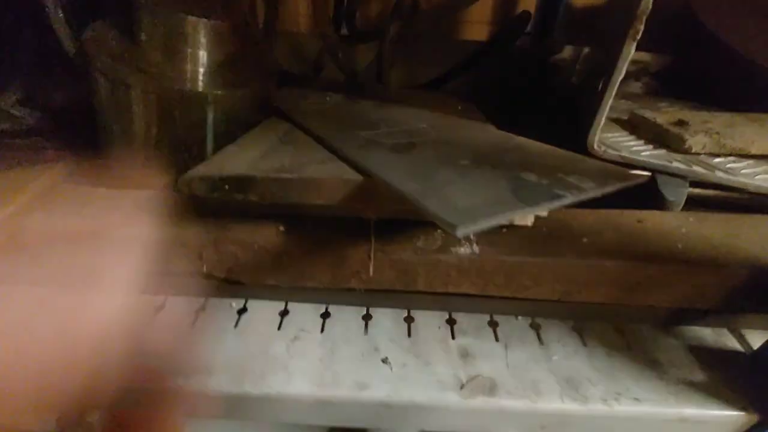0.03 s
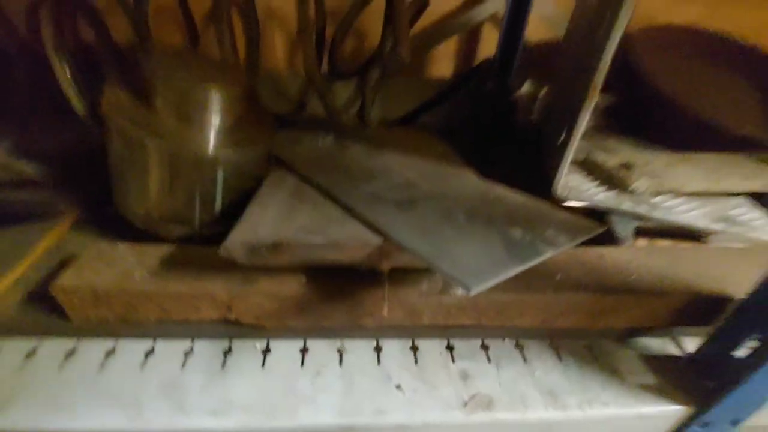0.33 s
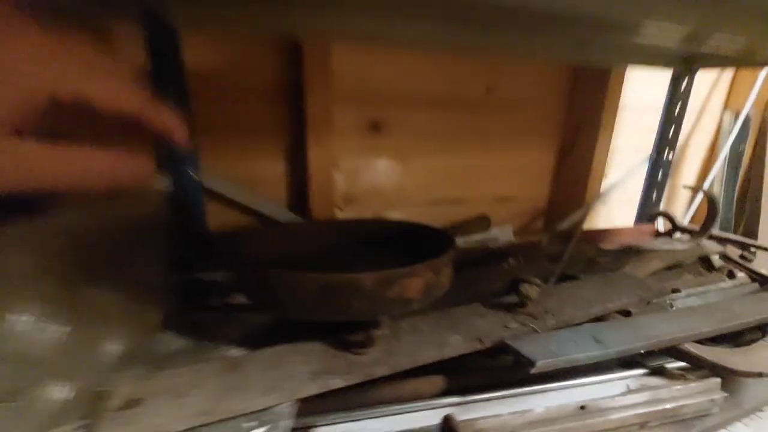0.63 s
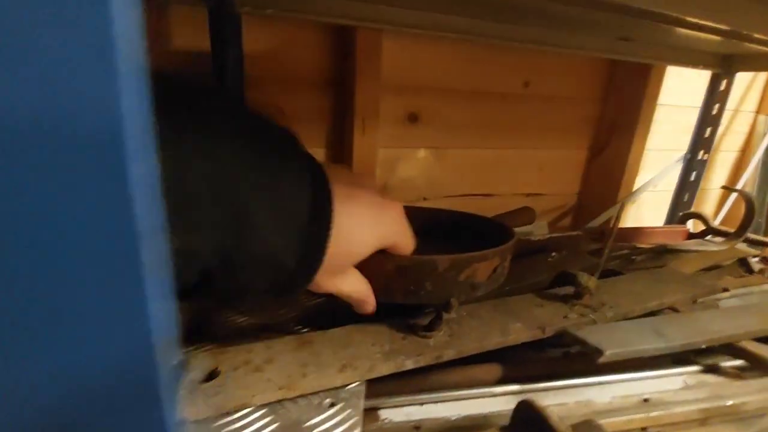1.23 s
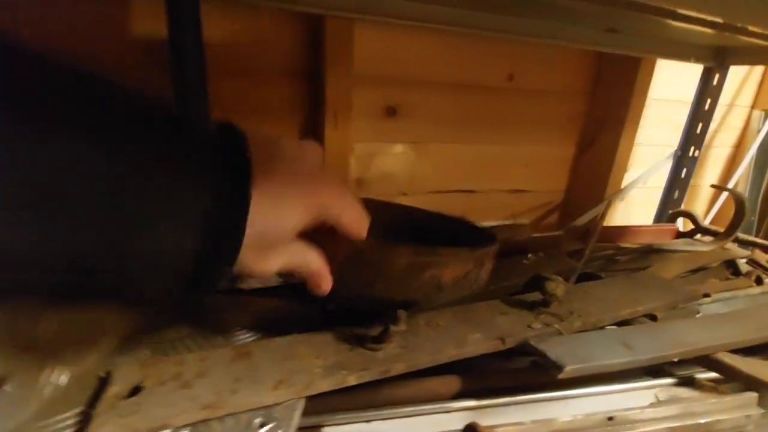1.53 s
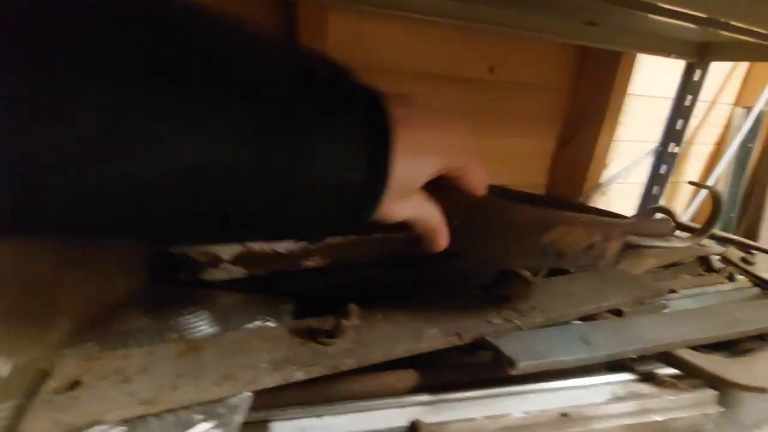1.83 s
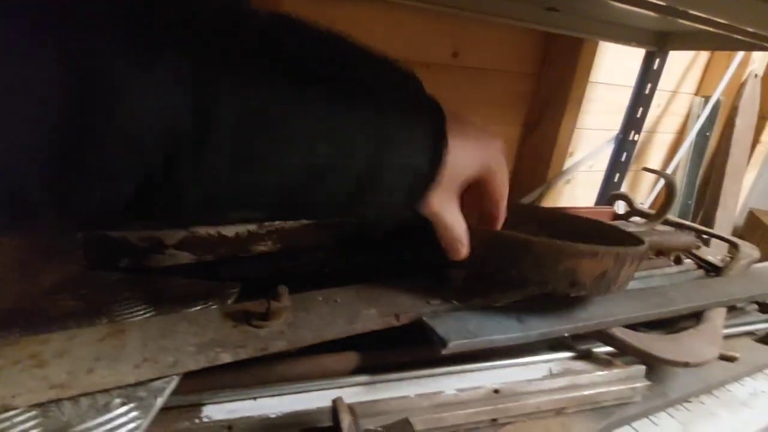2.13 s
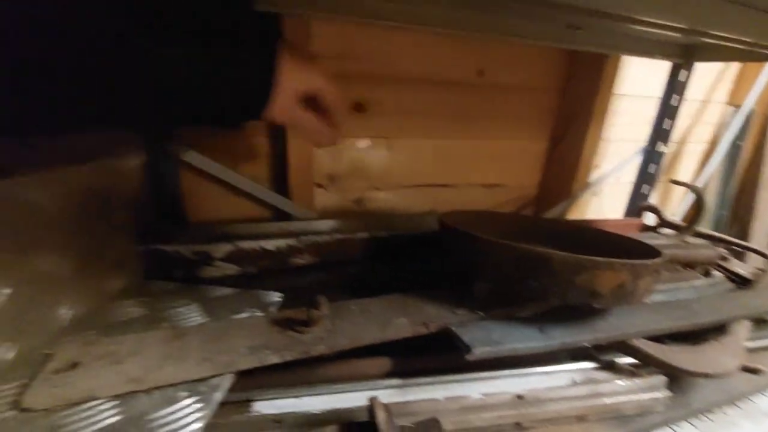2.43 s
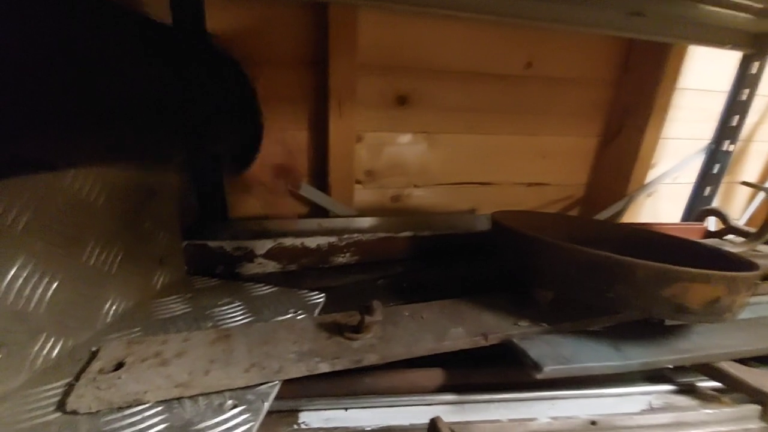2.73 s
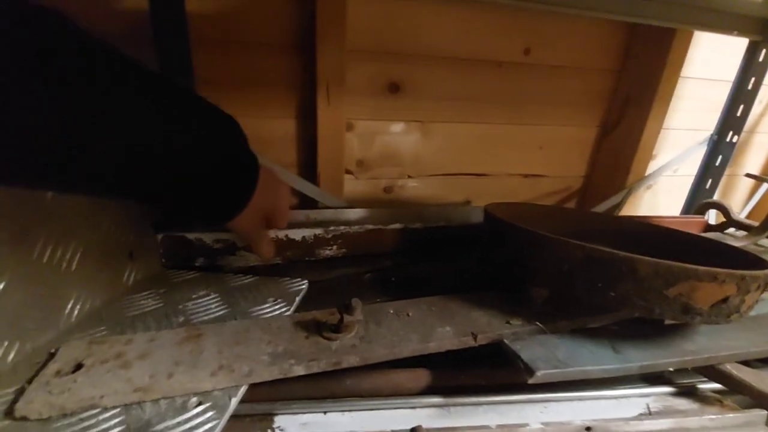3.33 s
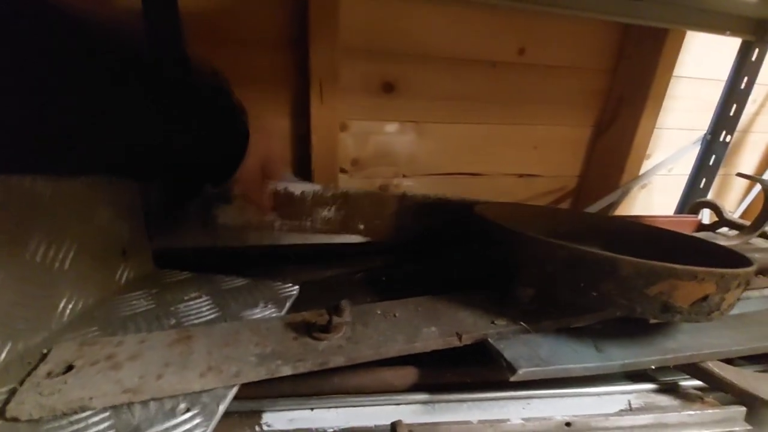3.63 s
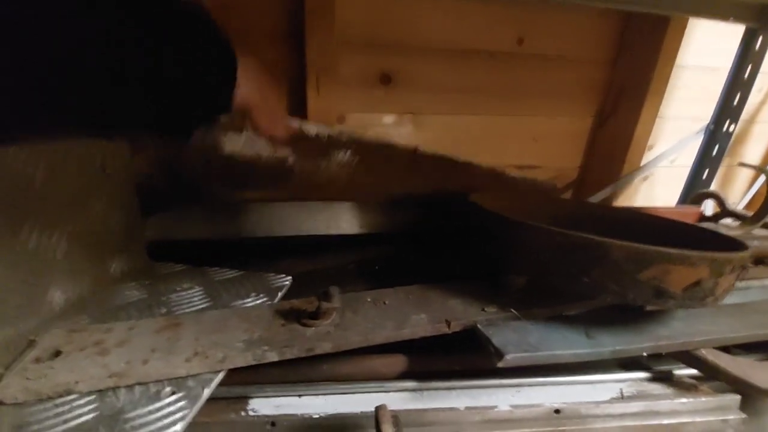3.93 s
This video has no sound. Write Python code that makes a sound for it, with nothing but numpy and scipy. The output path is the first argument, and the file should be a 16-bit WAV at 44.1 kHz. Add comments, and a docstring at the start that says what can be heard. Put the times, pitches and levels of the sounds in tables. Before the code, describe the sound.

An iron pan scrapes across piled scrap and lands with a ringing clatter, before a steel bar is knocked loose and dragged over steel plate. A sleeve rustles faintly near the microphone, over a shed's steady low rumble.

```python
"""A wooden shed with a steady low rumble; a sleeve brushes past the close stereo microphone.
A rusty iron pan is lifted off a shelf of scrap and set down with a rocking clatter; then a flat steel
bar is knocked loose and dragged over a steel plate in the pile. Blows ring the modes of pan, bar and
plate and the crowded modes of the pile; in a scrape, rust grains catch and slip and ring the metal."""
import sys
import numpy as np
from scipy import signal
from scipy.fft import rfft, irfft
from scipy.io import wavfile
from scipy.ndimage import uniform_filter1d

SR = 44100
rng = np.random.default_rng(int(sys.argv[2]) if len(sys.argv) > 2 else 0)


def generate_wav(sig):
    """Save sig (samples, or channels by samples) to the path in sys.argv[1] as 16-bit PCM at SR."""
    pcm = np.round(np.clip(np.atleast_2d(sig).T, -1, 1) * 32767).astype(np.int16)
    wavfile.write(sys.argv[1], SR, pcm)


N = 176400
TIME_S, FREQS_HZ = np.arange(N) / SR, np.fft.rfftfreq(N, 1 / SR)
RING_S = np.arange(SR) / SR


def amp(db):
    """Decibels to gain."""
    return 10 ** (np.asarray(db) / 20)


def unit(x):
    """Scale to rms 1."""
    return x / np.sqrt(np.mean(x ** 2) + 1e-20)


def at_hz(points, hz):
    """Read (frequency [Hz], value) points on a log-frequency axis."""
    point_hz, value = np.transpose(points)
    return np.interp(np.log(hz + 1), np.log(point_hz + 1), value)


def envelope(points):
    """Gain over time from (time [s], level [dB]) points."""
    return amp(np.interp(TIME_S, *np.transpose(points)))


def placed(x, left_db):
    """Lean a stereo pair: left over right by left_db."""
    return x * amp([[left_db / 2], [-left_db / 2]])


def add(mix, start_s, sound):
    """Mix a sound in at start_s."""
    part = mix[:, round(start_s * SR):][:, :sound.shape[1]]
    part += sound[:, :part.shape[1]]


def noise(gain, correlation=0):
    """Stereo noise of rms 1 with a given spectrum and left-right correlation."""
    a, b = rfft(rng.standard_normal((2, N)))
    mid, side = a * np.sqrt(1 + correlation), b * np.sqrt(1 - correlation)
    return unit(irfft(np.array([mid + side, mid - side]) * gain, N))


def coloured(x, gain):
    """Minimum-phase filter with the given gain over FREQS_HZ."""
    cepstrum = irfft(np.log(np.maximum(gain, 1e-5)), N)
    fold = 1 + np.sign(N / 2 - np.arange(N))
    fold[0] = 1
    taps = irfft(np.exp(rfft(cepstrum * fold)), N)[:2048]
    return signal.fftconvolve(x, taps[None], axes=1)[:, :x.shape[1]]


def ring(modes, strike_db=0, spread_s=0.0032):
    """Decaying stereo sines of a struck piece; they build up as the blow spreads through it."""
    hz, db, t60_s, lead_rad = np.transpose(modes)[:, :, None]
    fade = amp(db + strike_db - 60 * RING_S / t60_s) * (1 - np.exp(-RING_S / spread_s))
    phase = 2 * np.pi * hz * RING_S
    return np.array([(fade * np.sin(phase + side * lead_rad / 2)).sum(0) for side in (1, -1)])


def background(top_hz=1600, deep_hz=165, hiss_db=-72.5):
    """Low rumble with droning peaks, over faint hiss; the deep part swells on its own."""
    # (frequency [Hz], relative density [dB])
    rumble_colour = [(20, -46.5), (42, -25), (55, -15), (74, -5), (93, -12.5), (130, -0.5), (195, -2),
                     (225, 2), (300, -4.5), (335, -8), (400, -20), (470, -17), (600, -24.5), (850, -31),
                     (1250, -40), (1800, -47.5)]
    # (time [s], level [dB])
    rumble_level = [(0, -28.5), (1.0, -27), (2.0, -27.5), (2.3, -31), (2.6, -32.5), (3.4, -32.5),
                    (3.8, -30.5)]
    # (frequency [Hz], left-right correlation [1])
    rumble_correlation = [(30, 1), (130, 0.93), (300, 0.85), (700, 0.11), (2000, 0.09)]
    # narrow peaks: (frequency [Hz], half width [Hz], level [dB])
    drones = [(141.67, 3.9, -39), (171.6, 7.5, -44), (217.2, 6.9, -37), (237.1, 2.7, -38.5),
              (301.6, 8.7, -38)]
    # deep part against the rest: (time [s], gain [dB])
    deep_level = [(0, -6), (.35, 4), (.9, -4), (1.35, -3), (2.5, -4.5), (3.2, -4)]
    correlation, swell = at_hz(rumble_correlation, FREQS_HZ), envelope(rumble_level)
    rumble = noise(amp(at_hz(rumble_colour, FREQS_HZ)) / (1 + (FREQS_HZ / top_hz) ** 4), correlation)
    drone = sum(amp(db) * noise(1 / (1 + ((FREQS_HZ - hz) / width_hz) ** 2), correlation)
                for hz, width_hz, db in drones)
    low = swell * (rumble + drone / swell.max())
    deep = irfft(rfft(low) / (1 + (FREQS_HZ / deep_hz) ** 10), N)
    hiss = amp(hiss_db) * noise((FREQS_HZ + 500) ** -0.3)
    return placed(low + (envelope(deep_level) - 1) * deep, left_db=-1.5) + hiss


def sleeve():
    """Cloth rustles softly as the arm moves."""
    # (time [s], level [dB])
    rustle_level = [(0, -60), (.26, -61.5), (.33, -54.5), (.42, -62), (.52, -73), (.68, -75), (.72, -61),
                    (.82, -64.5), (.98, -68), (1.2, -60), (2.45, -62.5), (2.65, -71), (2.82, -69.5),
                    (2.9, -55), (2.98, -57), (3.07, -62), (3.25, -74)]
    # (frequency [Hz], relative density [dB])
    rustle_colour = [(300, -7), (1000, -1.5), (2200, 2.5), (4000, -4.5), (8000, -8), (13000, -5.5),
                     (16000, -5.5)]
    return envelope(rustle_level) * noise(amp(at_hz(rustle_colour, FREQS_HZ)))


def pile_ring(length, ragged_db=6, life_spread=0.5, hold_s=0.0022, shed_db=-21, shed_t60_s=0.56):
    """Crowded modes of the pile: noise bands, each with its own strength and decay, plus the shed's tail."""
    # (frequency [Hz], T60 [s])
    pile_decay = [(300, 0.2), (1000, 0.2), (2000, 0.088), (5000, 0.13), (14000, 0.13)]
    bins, frame = 513, 1024
    apart_hz, ragged_hz = 1372, 2700  # channels independent, modes most uneven, from here up
    hz, t, (left, other) = signal.stft(rng.standard_normal((2, SR)), SR, nperseg=frame)
    apart_rad = np.pi / 2 * np.minimum(hz / apart_hz, 1)[:, None]
    bands = np.array([left, np.cos(apart_rad) * left + np.sin(apart_rad) * other])
    scatter = unit(rng.standard_normal((bins, 1)) + 0.5 * rng.standard_normal((2, bins, 1)))
    scatter = np.clip(scatter, -2, 2) * np.minimum(hz / ragged_hz, 1)[:, None]
    t60_s = length * at_hz(pile_decay, hz)[:, None] * np.exp(life_spread * scatter)
    strength = amp(ragged_db * scatter)
    strength /= np.sqrt(uniform_filter1d(strength ** 2, size=15, axis=1))
    pile_fade = amp(-60 * np.maximum(t - hold_s, 0) / t60_s)  # shelf reflections hold the level briefly
    shed_fade = amp(shed_db - 60 * t / shed_t60_s)
    return signal.istft(bands * strength * np.hypot(pile_fade, shed_fade), SR, nperseg=frame)[1][:, :SR]


def loose_pieces(partials_hz, count=60, t60_s=0.12):
    """Stray partials of loose scrap: a random set, each with its own strength, phase and decay."""
    strength = rng.exponential(1, (2, count))
    life = rng.uniform(0.38, 0.98, (count, 1))
    phasors = strength * np.exp(2j * np.pi * rng.random((2, count))) / np.sqrt((strength ** 2).sum() / 4)
    hz = rng.choice(partials_hz, (count, 1), replace=False)
    waves = np.exp((2j * np.pi * hz - np.log(1000) / (t60_s * life)) * RING_S[:SR // 2])
    return (phasors @ waves).real


def plate_ring(strike_db=(0, 0), split_hz=25):
    """The warped steel plate rings in close, beating pairs of modes."""
    # (frequency [Hz], level [dB], T60 [s])
    plate_modes = [(720, -25, 0.16), (1365, -17.5, 0.11), (1850, -28, 0.14), (1936, -17.5, 0.16),
                   (1984, -20, 0.2), (2547, -21.5, .18), (3230, -24.5, 0.21), (3675, -22.5, 0.12),
                   (4500, -28.5, 0.13), (4830, -33.5, .2), (5300, -32.5, .22), (6230, -35, 0.24),
                   (10103, -36, 0.2), (10900, -44, .17), (11488, -32, .13), (12821, -33, .13),
                   (14540, -32, .11)]
    # where strike_db applies: (frequency [Hz])
    strike_hz = (4000, 11000)
    hz, db, t60_s = np.transpose(plate_modes + plate_modes)
    hz = hz + split_hz * np.sqrt(hz / strike_hz[0]) * rng.uniform(-1, 1, len(hz))
    lead_rad = rng.uniform(-2, 2, len(hz))
    weight_db = at_hz(np.c_[strike_hz, strike_db], hz[:, None])
    return ring(np.c_[hz, db, t60_s, lead_rad], weight_db) / np.sqrt(2)


def pan_ring(strike_db):
    """The iron pan's modes, weighted by where it is touched."""
    # (frequency [Hz], level [dB], T60 [s], left lead [rad])
    pan_modes = [(496, -5, 0.14, 1), (642, 5.5, 0.42, 1.47), (1008, -1.5, 0.27, -1.5), (1190, 0, 0.44, -2),
                 (1480, -17.5, .25, 10), (1750, -12, 0.75, 4), (1800, -14.5, 0.87, 1.5),
                 (2120, -13.5, 0.17, 4), (2250, 1, 0.3, 0.66), (2322, -17, 0.74, 4.5),
                 (2640, -10.5, 0.2, 1.5), (2940, -15, 0.3, 4.5), (3310, -10.5, 0.18, 1),
                 (3700, -18, 0.19, -5.5), (3810, -14, 0.28, 1.5), (4700, -15, 0.2, 2.5),
                 (5055, -18.5, 0.25, -2), (5530, -15.5, .15, 1), (6060, -24.5, 0.29, -5.5),
                 (6400, -24, 0.25, -3), (7000, -21.5, .2, 0)]
    # where strike_db applies: (frequency [Hz])
    strike_hz = (642, 1190, 2249, 3200, 5000)
    return ring(pan_modes, at_hz(np.c_[strike_hz, strike_db], np.array(pan_modes)[:, :1]))


def scrape(stroke, piece, piece_db, grains_per_s=700, spread_db=3.5, clump_db=2, clump_s=0.0045):
    """Rust grains catch and slip in clumps, ringing the pile and, piece_db against it, the rubbed piece."""
    # (frequency [Hz], gain [dB])
    pile_colour = [(250, -10.5), (600, 0), (1300, -2), (2200, 1.5), (4000, -9), (7000, -15.5),
                   (12000, -15.5), (16000, -23)]
    clumps = amp(clump_db * unit(uniform_filter1d(rng.standard_normal(N), round(clump_s * SR))))
    sizes = amp(spread_db * np.minimum(rng.exponential(1, N), 4))
    grit = clumps * sizes * rng.choice([-1, 1], N) * (rng.random(N) < grains_per_s / SR)
    pile = coloured(pile_ring(length=0.54), amp(at_hz(pile_colour, FREQS_HZ)))
    body = unit(unit(pile) + amp(piece_db) * unit(piece)) / np.sqrt(SR)
    return signal.fftconvolve((unit(grit) * envelope(stroke))[None], body, axes=1)[:, :N]


def sliding():
    """The pan is dragged off the pile; later the bar is dragged over the plate."""
    # (time [s], level [dB])
    pan_stroke = [(1.12, -96), (1.20, -49), (1.27, -41.5), (1.37, -70), (1.42, -58.5), (1.46, -46.5),
                  (1.52, -61), (1.59, -43), (1.65, -67.5), (1.71, -32), (1.76, -60), (1.87, -76),
                  (1.92, -56), (2.0, -86)]
    # (time [s], level [dB])
    bar_stroke = [(3.15, -100), (3.26, -57), (3.40, -57.5), (3.49, -52), (3.54, -36.5), (3.58, -69),
                  (3.65, -30), (3.73, -68), (3.79, -43), (3.87, -50), (3.92, -33), (4.0, -37.5)]
    pan = scrape(pan_stroke, pan_ring(strike_db=(-5.5, -0.5, -2, -8.5, 10)), piece_db=-9.5)
    bar = scrape(bar_stroke, plate_ring(), piece_db=-2.5)
    return placed(pan + bar, left_db=2)


def pan_skid():
    """Friction feeds one mode of the pan for a moment, then chokes it."""
    # (peak time [s], half length [s], frequency [Hz], level [dB], left lead [rad])
    squeals = [(1.57, .04, 1186, -49, -1.5), (2.078, 0.018, 1185, -12.5, -3.5), (2.12, 0.022, 2930, -34, 1)]
    out = np.zeros((2, N))
    for peak_s, half_s, hz, db, lead_rad in squeals:
        t = TIME_S - peak_s
        swell = amp(db) * np.exp(-(t / half_s) ** 2)
        out += swell * np.sin(2 * np.pi * hz * t + np.array([[lead_rad], [-lead_rad]]) / 2)
    return out


def plate_chatter():
    """The bar bangs on the plate and chatters against its edge."""
    # (time [s], mode gain at 4 kHz [dB], at 11 kHz [dB])
    blows = [(3.586, 2.5, -10), (3.605, -12, -2), (3.652, -16, -29)]
    out = np.zeros((2, N))
    for start_s, *strike_db in blows:
        add(out, start_s, plate_ring(strike_db))
    return placed(out, left_db=-1.5)


def bar_clang(note_hz=2134):
    """The struck steel bar gives a clang and one long note, which the hand damps."""
    # (frequency [Hz], level [dB], T60 [s], left lead [rad])
    bar_modes = [(587, -3, .12, 1.5), (985, -6.5, 0.43, 2.2), (1378, -3, 0.12, 3.5), (2013, 4, .18, 1.5),
                 (2464, -2, 0.14, 0.5), (3750, -10, .1, 4.5), (3900, -18, 0.29, 1), (4880, 0, .07, -0.5),
                 (5130, 1.5, 0.064, 1.5), (5200, -20, .35, 1), (5540, -28, 0.2, 0.5), (7160, -11, .14, 1),
                 (7700, -28, 0.293, 4.5), (10480, -24, .2, 0)]
    # (time [s], clang gain [dB], note level [dB], note T60 [s])
    blows = [(1.653, -23, -49, 0.35), (1.724, -47, -33.5, 0.36), (2.062, -27.5, -28, 0.38),
             (3.092, -44.5, -31, 0.19), (3.304, -52.5, -47, 0.15)]
    out, clang = np.zeros((2, N)), ring(bar_modes)
    for start_s, clang_db, note_db, t60_s in blows:
        add(out, start_s, amp(clang_db) * clang + ring([(note_hz, note_db, t60_s, 0)]))
    return placed(out, left_db=-2)


def pan_clatter():
    """The pan rocks as it is set down, ringing differently at each point of contact."""
    # (time [s], mode gain at each of pan_ring's five strike frequencies [dB])
    blows = [(2.046, -14, -21.5, -29, -16, -29), (2.094, -18, -27, -36, -18, -29),
             (2.206, -42.5, -17.5, -29, -25, -22), (2.470, -33, -25, -65, -36, -36),
             (2.4805, -48, -47, -20.5, -37, -55)]
    out = np.zeros((2, N))
    for start_s, *strike_db in blows:
        add(out, start_s, pan_ring(strike_db))
    return out


def pile_knocks(gain_db=-2.1, low_cut_hz=414, loose_db=-7.5, crack_db=-5.5, crack_s=0.019, crack_hz=3000):
    """Iron knocks on the scrap, shaking pile, loose pieces and shed; the first contact is brighter."""
    # (time [s], relative level in each of the six bands [dB], ring length [x], left over right [dB])
    knocks = [ (1.6532, -22, -11, -15.5, -14.5, -33, -48.5, 0.64, 3.5),
              (2.0443, -16.5, -19.5, -16.5, -29, -32, -45, 1.3, 1.5),
              (2.06, -49, -19, -11, -20.5, -29, -39, 1.26, 0.5),
              (2.0917, -26.5, -26, -22, -32, -50, -55, 2.4, 3),
              (2.1827, -11, -19, -13, -30, -50, -57, 0.98, -2),
              (2.192, -26.5, -31, -24, -46, -45, -60, 1.6, 14.5),
              (2.2056, -27, -27, -13, -20.5, -28.5, -37, 0.78, 0),
              (2.2620, -36, -35, -33, -39, -47, -56, 1.77, 0),
              (2.468, -20, -29, -19.5, -41, -51.5, -62, 1.25, 1.5),
              (3.092, -43.5, -32, -28, -30.5, -38, -59.5, 0.46, 7.5),
              (3.3020, -67, -44.5, -41.5, -46.5, -64, -66, 1.03, 0.5),
              (3.4160, -43, -54, -42, -45.5, -52, -60.5, 1.2, 4.5),
              (3.4674, -48, -44, -41, -46, -65, -69, 1.1, 0),
              (3.5503, -28, -21.5, -19, -25.5, -43, -68, 0.56, 4),
              (3.5859, -14, -17, -6, -15, -24.5, -40.5, 0.81, 2),
              (3.608, -43, -21, -17, -21, -31.5, -32.5, 0.86, 2.5),
              (3.6970, -36, -29.5, -34.5, -42, -65, -68, 1.35, -3),
              (3.862, -60, -53, -32, -38, -41.5, -49.5, 0.58, 5),
              (3.9813, -59, -32, -25.5, -29.5, -34.5, -51, 0.87, 1)]
    # (band centre [Hz])
    band_hz = (500, 1100, 2000, 4000, 7000, 13000)
    # body of the loaded shelf: (frequency [Hz], gain [dB])
    shelf_colour = [(390, -4.5), (500, 1), (620, -2), (780, -3.5), (1050, -0.5), (1500, 2), (1900, 2),
                    (2500, 1), (3200, -1.5), (5000, 0), (8500, 1), (13000, 7.5)]
    out, partials_hz = np.zeros((2, N)), rng.uniform(3400, 15000, 110)
    low_cut = 1 / np.sqrt(1 + (low_cut_hz / (FREQS_HZ + 1)) ** 6)
    for start_s, *band_db, length, left_db in knocks:
        body = pile_ring(length)
        treble = signal.lfilter(*signal.butter(1, crack_hz, "high", fs=SR), body)
        body += amp(crack_db) * np.exp(-RING_S / crack_s) * treble
        add(body, 0, amp(loose_db) * loose_pieces(partials_hz))
        density_db = np.array(band_db) + 10 * np.log10(SR / 2 / np.array(band_hz))
        colour_db = at_hz(np.c_[band_hz, density_db], FREQS_HZ) + at_hz(shelf_colour, FREQS_HZ)
        add(out, start_s, placed(coloured(body, amp(colour_db) * low_cut), left_db))
    return amp(gain_db) * out


def scene():
    """Blows and friction over sleeve and rumble, in stereo."""
    blows = pile_knocks() + pan_clatter() + bar_clang() + plate_chatter()
    return blows + pan_skid() + sliding() + sleeve() + background()


def record(dry):
    """Low-pass at 15.6 kHz."""
    taps = signal.firwin(255, 15600, window=("kaiser", 8), fs=SR)
    return signal.oaconvolve(dry, taps[None], "same")


dry = scene()
out = record(dry)
generate_wav(out)
```